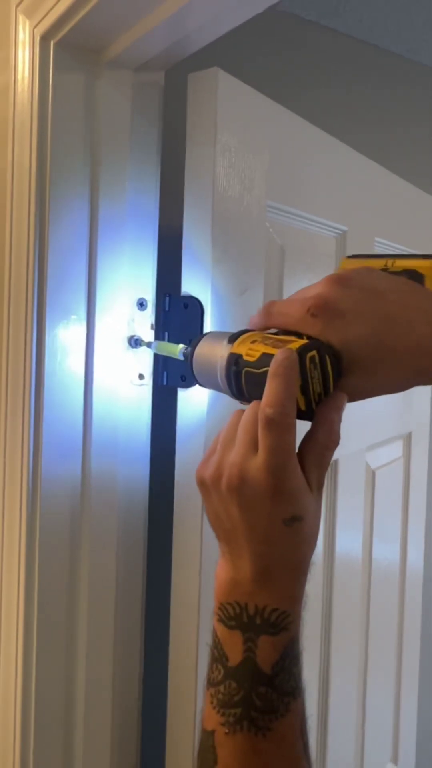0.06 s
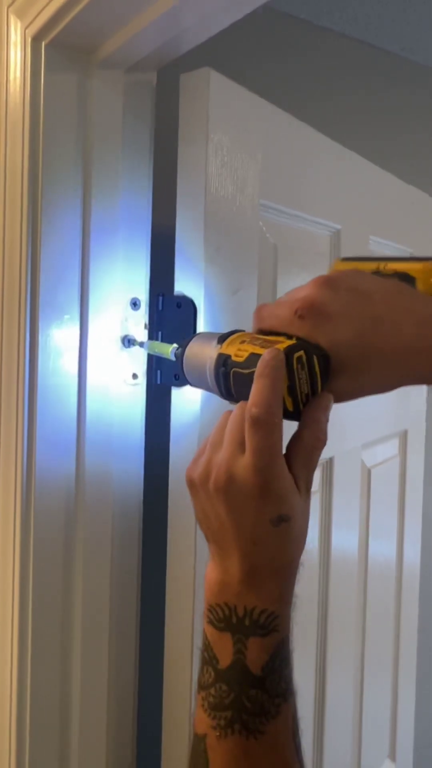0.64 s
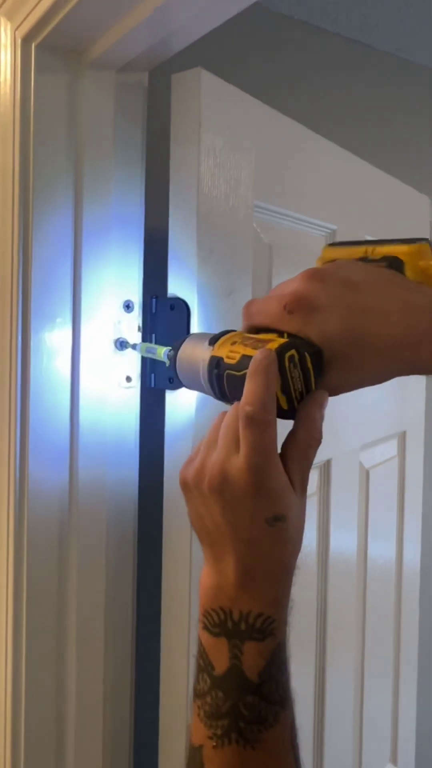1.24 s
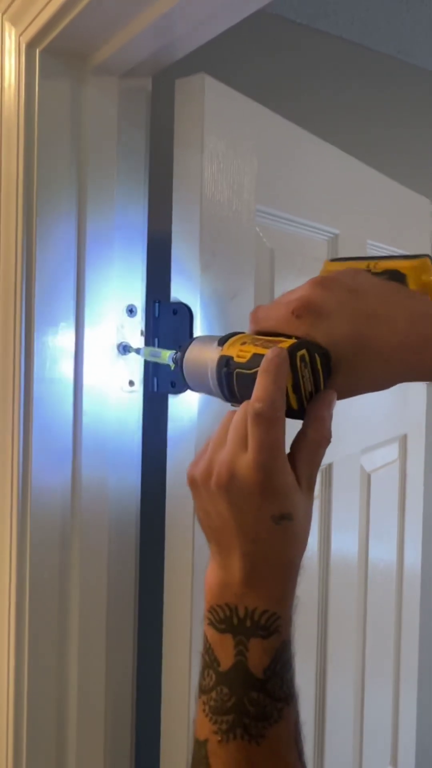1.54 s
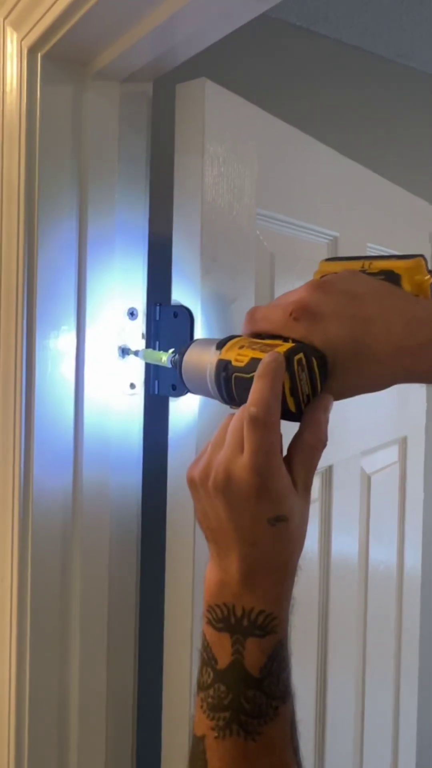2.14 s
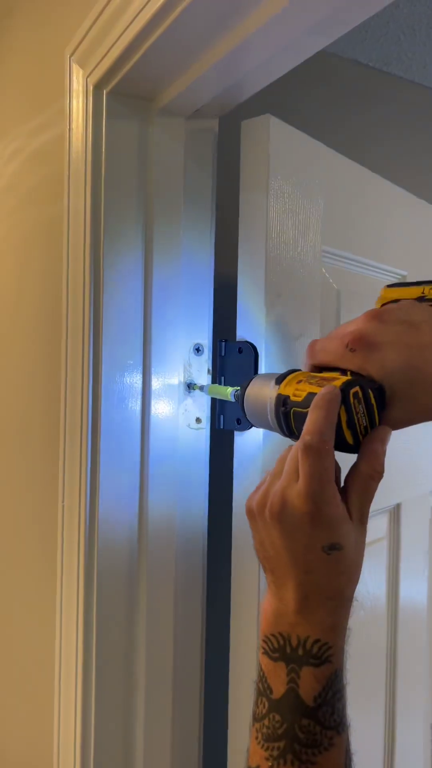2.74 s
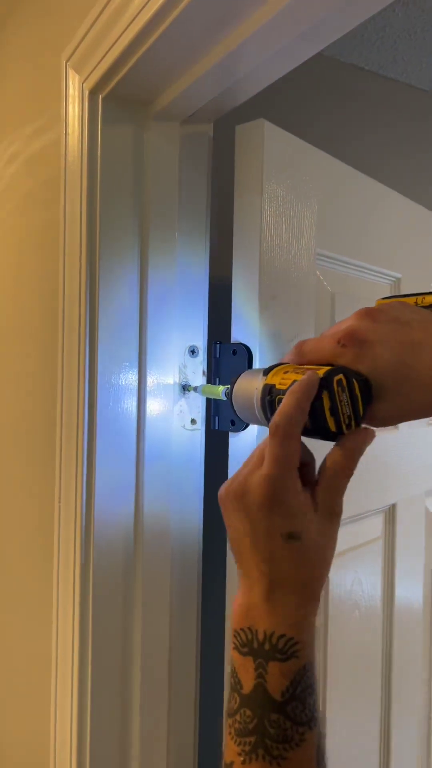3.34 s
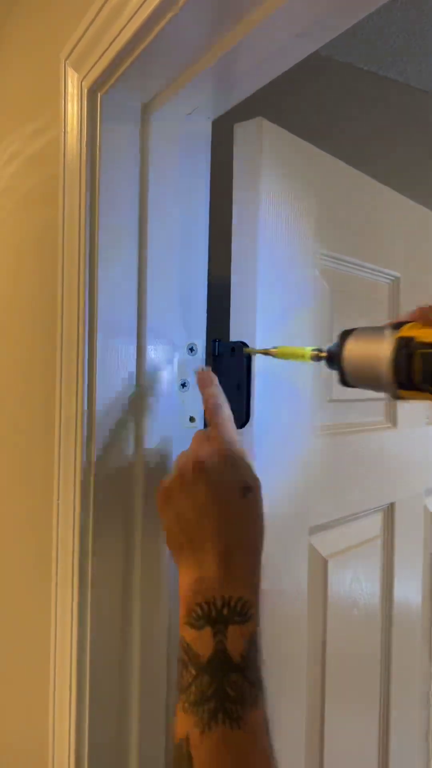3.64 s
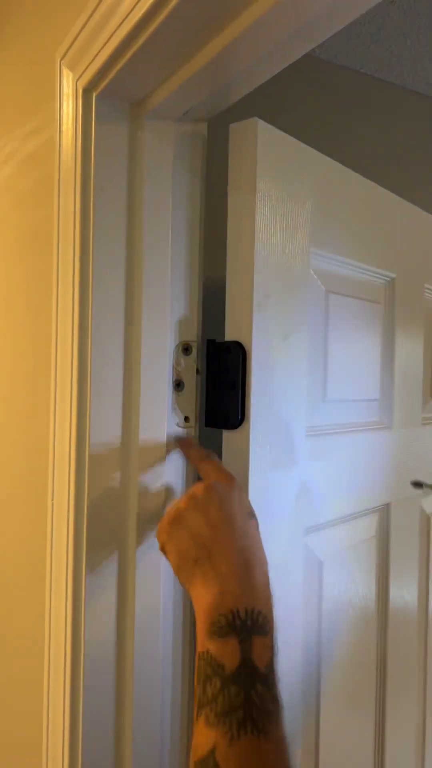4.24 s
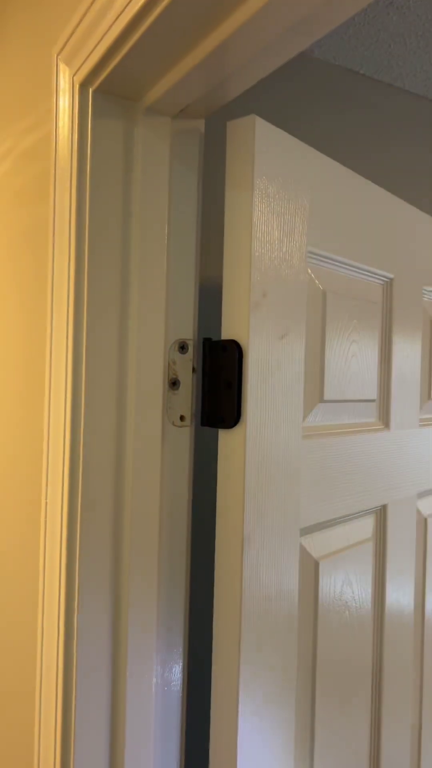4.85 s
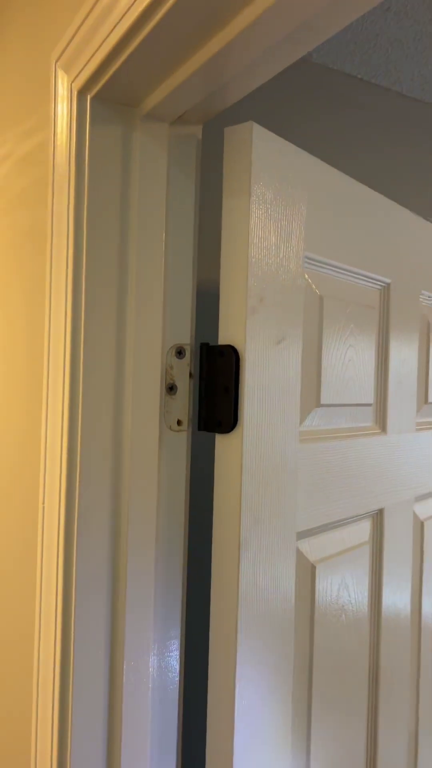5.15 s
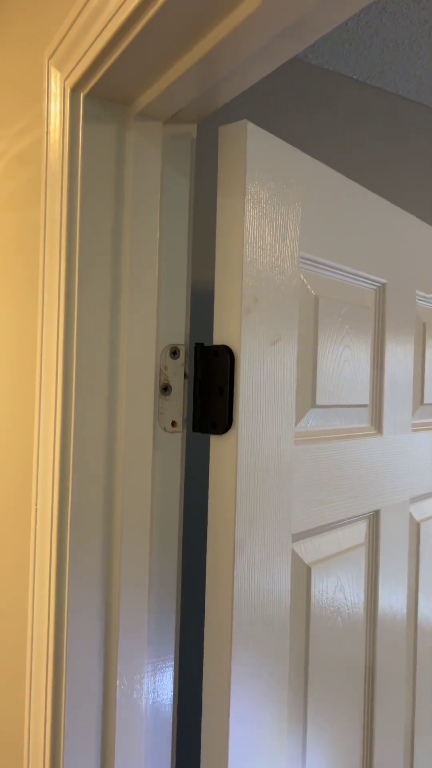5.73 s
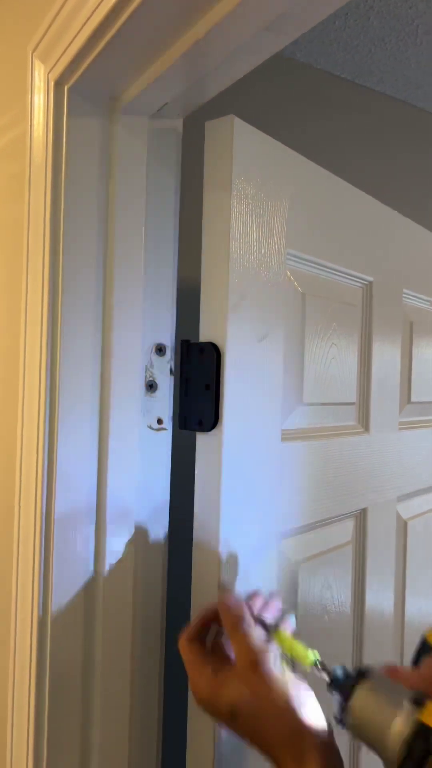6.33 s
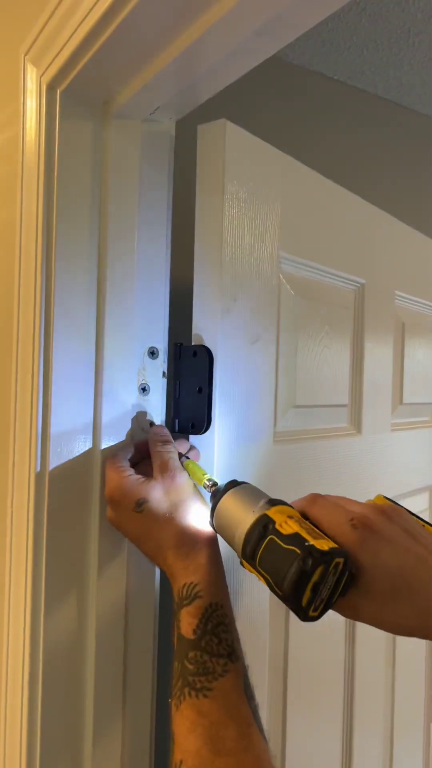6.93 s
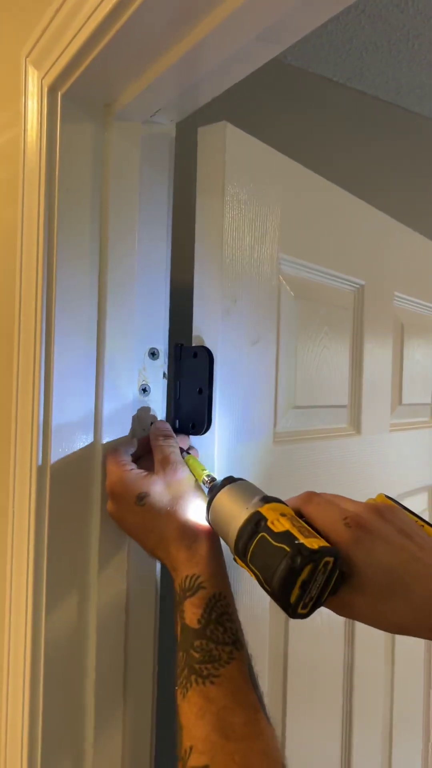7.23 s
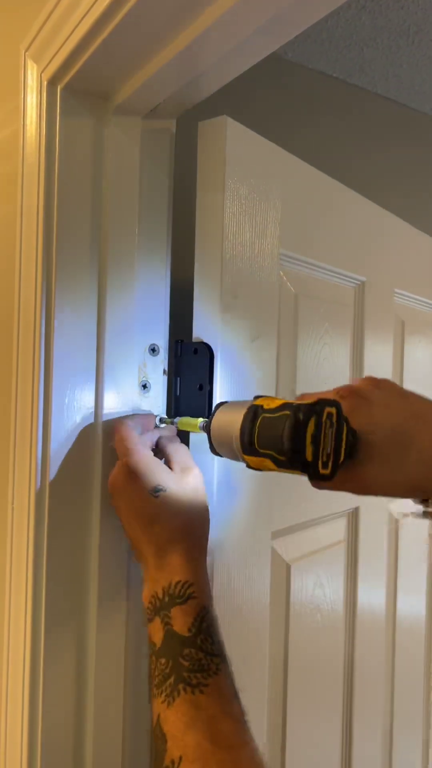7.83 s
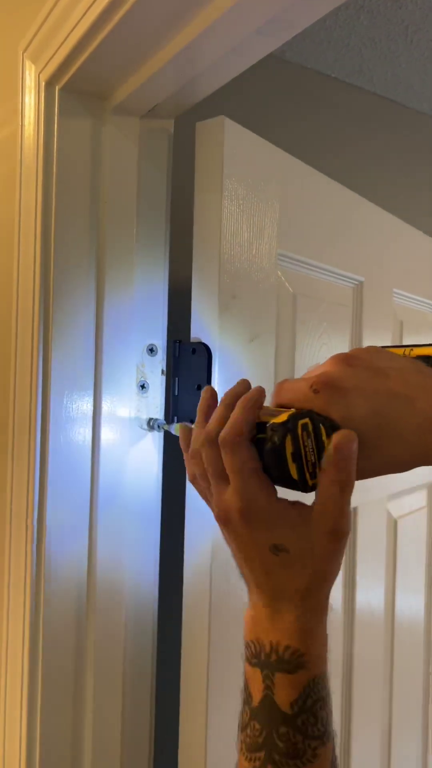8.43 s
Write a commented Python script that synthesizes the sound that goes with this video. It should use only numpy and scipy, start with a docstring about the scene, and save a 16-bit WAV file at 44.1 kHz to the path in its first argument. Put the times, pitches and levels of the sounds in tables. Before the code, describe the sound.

In a bare, echoing hallway, a nearby impact driver fires seven short bursts, the last after a gap, each mixing motor whir, steel clacks, a grinding screw and a low boom from the door. Much softer handling follows over a low rush of air: a fingertip knocks and slides on the hinge, loose screws clink in a palm, and the bit scrapes onto another screw with a light thud.

```python
"""A cordless impact driver sinks a hinge screw into a door frame in short bursts, in a bare hallway.
In each burst the motor whirs up, a hammer inside clacks on a steel block (the anvil) that turns the
bit, the screw grinds in the wood, and the frame and door thump. Then a finger taps and brushes the
hinge, loose screws clink in a hand and the bit is set on the next screw. The walls echo it all,
over a soft rush of air."""
import sys
import numpy as np
from scipy import signal
from scipy.fft import rfft, irfft, next_fast_len
from scipy.io import wavfile

SR = 44100
rng = np.random.default_rng(int(sys.argv[2]) if len(sys.argv) > 2 else 0)


def wav_record(signal):
    """Record a signal, one row per channel, as 16-bit PCM in the file named by sys.argv[1]."""
    frames = np.transpose(np.atleast_2d(signal))
    bounded = np.clip(frames, -1, 1)
    # unit amplitude maps onto the largest positive 16-bit level
    quanta = np.round(bounded * 32767).astype(np.int16)
    wavfile.write(sys.argv[1], SR, quanta)


N = 373968
T = np.arange(N) / SR

# hammer blows, the last row mostly a knock of the wood: (time [s], wind-up rasp [dB], anvil clang [dB], bright
# crack [dB], wood knock [dB],
BLOWS = [(0.022, -15.5, -13, -14, -16.5, -4, 5438), (0.399, -31, -21.5, -19.5, -39.5, -14, 3686),
         (0.4126, -16, -12, -15, -17.5, -1.5, 2430), (0.4187, -30.5, -23.5, -17.5, -22.5, -12, 6400),
         (0.4448, -19.5, -10.5, -13, -16.5, -6, 4830), (0.6883, -31, -20, -27.5, -24, -11.5, 3000),
         (0.702, -19, -16.5, -15, -25, -9.5, 5230), (0.7374, -18, -13, -14, -16, 1.5, 4235),
         (0.9845, -20, -16, -15, -23.5, 2, 6118), (1.011, -17, -11.5, -14, -17.5, -5.5, 6274),
         (1.2301, -22, -17, -14.5, -33, 1, 6250), (1.2511, -13.5, -18.5, -14, -25, -6, 5830),
         (1.2773, -19.5, -16, -17, -25, 1, 5144), (1.5862, -21, -17, -15, -29.5, 2, 5180),
         (1.605, -18.5, -12.5, -18, -22, -14.5, 4800), (1.6225, -30, -26.5, -12.5, -34, -17, 4400),
         (1.6413, -30, -19.5, -24, -37, -13.5, 2500), (1.6646, -12, -15.5, -14.5, -19.5, -0.5, 6000),
         (1.672, -32.5, -21.5, -20.5, -24, -15, 3300), (2.7168, -26.5, -15.5, -16.5, -30, -5, 5420),
         (2.736, -21.5, -10, -13, -20.5, -3.5, 2760), (2.752, -26, -15.5, -13, -24, -16, 5000),
         (2.785, -24.5, -13.5, -17.5, -17.5, -21, 4190), (2.795, -30.5, -24.5, -19.5, -17.5, -9.5, 7000)]
# jolts from the driver's kick, hands or bit: (time [s], door post [dB], panel [dB], frame knock [dB])
JOLTS = [(0.01, -35, -33, -23.5), (0.434, -29.5, -39, -24.5), (0.702, -43.5, -18, -27.5),
         (0.756, -23.5, -24, -24.5), (1.001, -31.5, -37, -29.5), (1.04, -43.5, -27.5, -21),
         (1.238, -26.5, -31.5, -31.5), (1.304, -27, -25, -20.5), (1.591, -25, -27, -38.5),
         (1.691, -24.5, -40.5, -27), (2.442, -46.5, -52, -52.5), (2.724, -35, -45, -31.5),
         (2.78, -27.5, -22.5, -21.5), (7.008, -53, -53.5, -52.5), (7.884, -40.5, -39, -44.5),
         (7.916, -30.5, -44, -48.5), (8.172, -52.5, -53, -61)]
# tone colours of knocked wood and of a grinding screw: (frequency [Hz], level [dB])
KNOCK_COLOUR = [(100, -23), (200, -5), (290, -1), (380, -5.5), (560, 2), (720, -7), (950, -5),
                (1400, -17.5), (2500, -30.5), (6000, -62.5)]
GRIND_COLOUR = [(100, -15.5), (280, 4.5), (550, 4.5), (750, -7.5), (1400, 1.5), (2200, -3.5), (3200, -5),
                (6500, -7.5), (10000, -17.5), (16000, -20)]
# how alike left and right are for near and far sounds: (frequency [Hz], likeness [1 = the same])
NEAR = [(150, .999), (600, 1), (1300, 0.56), (4500, 0.55), (7000, 0.57), (14000, 0.47)]
FAR = [(120, 1), (300, 0.99), (640, 0.57), (1400, 0.56), (5000, 1), (12000, .05)]


def amp(db):
    """Turn decibels into a gain."""
    return 10 ** (np.asarray(db) / 20)


def at_hz(points, hz, column=1):
    """Read a table's column between its rows, on a log-frequency scale."""
    points = np.array(points)
    return np.interp(np.log(np.maximum(hz, 1)), np.log(points[:, 0]), points[:, column])


def level(rows):
    """A gain that moves through (time [s], level [dB]) rows."""
    return amp(np.interp(T, *np.transpose(rows)))


def stereo(mid, side, likeness, hz):
    """Blend a common and an opposing spectrum into left and right."""
    alike = np.clip(at_hz(likeness, hz), -1, 1)
    return np.sqrt(1 + alike) * mid + np.sqrt(1 - alike) * side * [[1], [-1]]


def noise(colour, likeness):
    """Stereo noise of a given tone colour and left-right likeness, with an average power of 1."""
    size = next_fast_len(N)
    hz = np.arange(size // 2 + 1) * SR / size
    mid, side = rfft(rng.standard_normal((2, size))) * amp(at_hz(colour, hz))
    bass_cut = np.minimum(hz / colour[0][0], 1) ** 2
    out = irfft(bass_cut * stereo(mid, side, likeness, hz), size)[:, :N]
    return out / out.std()


def clicks(times, heights):
    """Clicks one sample long."""
    out = np.zeros(N)
    np.add.at(out, np.clip(np.round(np.asarray(times) * SR).astype(int), 0, N - 1), heights)
    return out


def bursts(times, db, t60, rise):
    """Loudness of hits that build in about `rise` seconds and fade by 60 dB in `t60` seconds."""
    fall, swell = amp(-120 / (t60 * SR)), np.exp(-1 / (rise * SR))
    energy = signal.lfilter([1], [1, -fall], clicks(times, amp(db) ** 2) + 1e-20)
    return np.sqrt(signal.lfilter([1 - swell], [1, -swell], energy))


def ring(force, hz, t60):
    """Each click starts a fading pure tone as strong as the click."""
    fade, step = amp(-60 / (t60 * SR)), 2 * np.pi * hz / SR
    return signal.lfilter([0, np.sin(step)], [1, -2 * fade * np.cos(step), fade * fade], force + 1e-18)


def add(out, at, sound):
    """Mix a short sound in at a given time."""
    first = max(round(at * SR), 0)
    out[..., first:first + len(sound)] += sound[:N - first]


def air(level_db=-59.5):
    """Air rushes softly and steadily, mostly in the bass."""
    # tone colour of the air: (frequency [Hz], level [dB])
    air_colour = [(15, -38.5), (25, -14), (80, -3.5), (108, -10), (255, -16), (293, -13.5), (326, -19.5),
                  (695, -17.5), (820, -28.5), (1020, -22.5), (1400, -25), (1800, -32), (16000, -77)]
    return amp(level_db) * noise(air_colour, FAR)


def hallway(sound, early_db=2.5, early_t60=0.31, gap_s=0.014):
    """Dense echoes: a quick share from the doorway and a long tail that dies away band by band."""
    # echo of the bare walls: (frequency [Hz], fade time [s], level [dB])
    walls = [(59.93, 0.68, -5), (155.86, 0.49, 0.5), (500, 0.85, -3.5), (1000, 1.05, -8.5), (1492, 1.3, -2),
             (2236, 0.98, -12.5), (6000, 0.97, -9.5), (8973, 0.71, -7), (15280, .38, -11)]
    size = 65536
    t, hz = np.arange(size) / SR, np.arange(size // 2 + 1) * SR / size
    centres = np.geomspace(50, 16000, 18)
    mid, side = rfft(rng.standard_normal((2, size)))
    white = stereo(mid, side, FAR, hz) / np.sqrt(2)
    onset, echo = 1 - np.exp(-(t / gap_s) ** 2), 0
    for centre, share in zip(centres, np.eye(len(centres))):
        band = irfft(white * np.interp(np.log(hz + 1), np.log(centres), share), size)
        late, early = (amp(-60 * t / t60) * onset for t60 in (at_hz(walls, centre), early_t60))
        energy = late ** 2 / np.sum(late ** 2) + amp(early_db) ** 2 * early ** 2 / np.sum(early ** 2)
        echo = echo + band * np.sqrt(energy) * amp(at_hz(walls, centre, column=2))
    return signal.fftconvolve(sound.mean(axis=0, keepdims=True), echo, axes=1)[:, :N]


def microphone_ports(sound, lead_rad=-0.3):
    """Above about 5 kHz the direct sound reaches the two microphone openings out of step."""
    size = next_fast_len(N)
    turn = np.interp(np.arange(size // 2 + 1) * SR / size, [4600, 6500], [0, lead_rad])
    return irfft(rfft(sound, size) * np.exp(.5j * turn * [[1], [-1]]), size)[:, :N]


def finger_brush():
    """A finger slides over the hinge with a faint hiss."""
    # loudness of the slide: (time [s], level [dB])
    stroke = [(3.95, -110), (4.1, -74), (4.17, -74), (4.235, -60), (4.3, -81.5), (4.7, -86.5), (4.95, -110)]
    # tone colour of rubbing skin: (frequency [Hz], level [dB])
    skin_colour = [(600, -10), (2000, 0.5), (4000, -10.5), (7000, -3), (10000, -11), (15000, -12)]
    return level(stroke) * noise(skin_colour, FAR)


def finger_tap(at=3.751, tap_db=-43, hollow_db=-53):
    """A fingertip taps the hinge: the wood behind it gives a short, hollow knock."""
    hollow = ring(clicks([at], amp(hollow_db)), hz=323, t60=0.16)
    return hollow + bursts([at], [tap_db], t60=0.084, rise=0.00057) * noise(KNOCK_COLOUR, NEAR)


def rattled(rows, spread_s, loss_db, count=3):
    """Each touch is followed by a few weaker ones at uneven delays."""
    rows = np.array(rows)
    chance = rng.random((len(rows), count, 2))
    after = np.repeat(rows[:, None], count, axis=1)
    after[..., 0] += spread_s * np.cumsum(0.64 + chance[..., 0], axis=1)
    after[..., 1] -= loss_db * (np.sqrt(np.arange(1, count + 1)) + chance[..., 1])
    return np.vstack([rows, after.reshape(-1, 3)])


def steel_ticks(rows, tones, ring_t60, ring_db, tick_db, snap_db, detune):
    """Small steel parts touch: a tick, a bright snap and a ring whose pitch varies with each touch."""
    # tone colours of the tick and the snap: (frequency [Hz], level [dB])
    tick_colour = [(300, -23), (1200, 2.5), (2200, 6.5), (3300, 2.5), (5500, -6.5), (8000, -23),
                   (15000, -41.5)]
    snap_colour = [(3000, -24.5), (6000, 1.5), (8000, -3.5), (11000, -6), (15500, -19.5)]
    times, db, treble = np.transpose(rows)
    out = amp(tick_db) * bursts(times, db, t60=0.058, rise=0.00015) * noise(tick_colour, NEAR)
    out += amp(snap_db) * bursts(times, db + treble, t60=0.03446, rise=0.00022) * noise(snap_colour, NEAR)
    t = T[:SR // 5]
    fade = amp(-60 * t / ring_t60)
    for at, touch_db, (grip, *chance) in zip(times, db, rng.standard_normal((len(db), len(tones) + 1))):
        tone = sum(amp(tone_db + 2 * luck) * np.sin(2 * np.pi * hz * (1 + detune * grip) * t)
                   for (hz, tone_db), luck in zip(tones, chance))
        add(out, at, amp(touch_db + ring_db) * fade * tone)
    return out


def loose_screws():
    """Screws clink together in the palm, which barely lets them ring; last, a screw is set on the bit."""
    # screws touching: (time [s], level [dB], extra treble [dB])
    clinks = [(5.2116, -58.5, -9), (5.306, -62, -9), (5.3991, -51, -16), (5.4125, -53, -3),
              (5.5643, -46, -23), (5.6266, -53, -26)]
    # ringing tones of a screw: (frequency [Hz], level [dB])
    screw_tones = [(3380, 5), (4870, -3.5), (5566, -10), (8000, -12)]
    return steel_ticks(rattled(clinks, spread_s=0.0056, loss_db=5.0), screw_tones,
                       ring_t60=0.021, ring_db=-8.0, tick_db=-9.0, snap_db=-5.0, detune=0.032)


def bit_ticks():
    """The bit ticks on hinge and screw heads; held tight in the driver, it barely rings."""
    # ticks of bit and trigger: (time [s], level [dB], extra treble [dB])
    touches = [(1.5595, -20.5, 4), (2.4209, -44, -13.5), (2.4957, -42.5, -34), (2.6309, -54, -9),
               (3.3972, -40, -2.5), (3.4161, -40.5, -14), (6.3844, -53, -19), (7.0085, -56, -37),
               (7.3794, -62.5, -30), (7.5694, -61, -22), (7.7677, -49.5, -24.5), (7.8555, -37, -21.5),
               (7.8795, -34, -15.5), (8.0202, -51.5, -19), (8.2694, -57, -21), (8.289, -58, -19.5),
               (8.322, -61, -19)]
    # ringing tones of the bit: (frequency [Hz], level [dB])
    bit_tones = [(1400, -1), (2050, 1), (2490, 0), (2900, -2)]
    return steel_ticks(rattled(touches, spread_s=0.015, loss_db=7.5), bit_tones,
                       ring_t60=0.025, ring_db=-11.5, tick_db=-7.0, snap_db=-6.0, detune=0.064)


def bit_skid(start=7.86, end=7.908, skid_db=-40.5, wood_db=-8.0, count=16):
    """The bit skids into the screw head in a quick run of touches that swells and fades."""
    times = np.linspace(start, end, count) + rng.normal(0, 0.0011, count)
    force_db = rng.normal(0, 2.9, count) + 20 * np.log10(np.hanning(count + 2)[1:-1])
    scrape = noise(GRIND_COLOUR, NEAR) + amp(wood_db) * noise(KNOCK_COLOUR, NEAR)
    return bursts(times, skid_db + force_db, t60=0.012, rise=0.00015) * scrape


def door_boom(push_s=0.0058, detune=0.016):
    """Each jolt sets door post, panel and frame booming at their own pitches; the hinge rings faintly."""
    # tones of the post, the panel, and the frame with its hinge: (frequency [Hz], level [dB], fade [s])
    post_tones = [(61.02, -1, 0.31), (91, 0.5, 0.37)]
    panel_tones = [(158, 2.5, 0.34)]
    frame_tones = [(182.8, -8, 0.27), (310.2, -10.5, .15), (392, -22.5, 0.34), (472, -19, 1.3),
                   (588, -17, .55), (1550, -35, 1.1)]
    times, *forces = np.transpose(JOLTS)
    out, t = np.zeros(N), T[:SR]
    swell = 1 - np.exp(-t / push_s)
    for tones, force in zip((post_tones, panel_tones, frame_tones), forces):
        for at, force_db, shifts in zip(times, force, rng.standard_normal((len(times), len(tones)))):
            boom = sum(amp(db - 60 * t / t60) * np.sin(2 * np.pi * hz * (1 + detune * shift) * t)
                       for (hz, db, t60), shift in zip(tones, shifts))
            add(out, at, amp(force_db) * swell * boom)
    return out


def wood_thuds():
    """The wood gives a dull knock with each jolt."""
    times, _, _, knock_db = np.transpose(JOLTS)
    return bursts(times, knock_db, t60=0.11, rise=0.0009) * noise(KNOCK_COLOUR, NEAR)


def grinding_hum():
    """A low, rough grinding hum lingers between the bursts and dies away."""
    # loudness of the hum: (time [s], level [dB])
    hum_levels = [(0, -31.5), (.12, -37.5), (.29, -32), (.39, -41.5), (.63, -36.5), (.85, -48.5),
                  (1.95, -60), (2.35, -86.5)]
    # its tone colour: (frequency [Hz], level [dB])
    hum_colour = [(60, -7), (150, -5), (470, -1.5), (750, -6), (1550, -5), (2600, -14.5), (6000, -15),
                  (9000, -27), (15000, -44.5)]
    return level(hum_levels) * noise(hum_colour, FAR)


def motor(spin_up_s=0.02, spin_up_db=20, start_hz=2600, top_hz=4100, gear_db=-5, coast_t60=0.022,
          chatter_db=4.5, load_db_per_s=260, rest_after_s=0.01, rest_half_s=0.0032, rest_db=-14.5):
    """Gears whir up in pitch and level until the hammer engages; then the screw grinds unevenly."""
    # trigger pulls: (start [s], release [s], whir [dB], grinding [dB])
    pulls = [(-0.01, 0.019, -20, -21), (0.384, 0.415, -17.5, -25), (0.661, 0.784, -25, -28.5),
             (0.953, 1.064, -24, -31.5), (1.201, 1.312, -26, -24), (1.565, 1.684, -27, -27),
             (2.686, 2.815, -30.5, -24.5)]
    # tone colour of the whir: (frequency [Hz], level [dB])
    whir_colour = [(250, -11), (900, -14.5), (1500, -10.5), (2100, 2), (3700, -3.5), (5000, -6.5),
                   (7000, -9), (10000, -20.5), (16000, -28.5)]
    whir, grind, gear_hz = np.zeros((3, N))
    for start, release, whir_db, grind_db in pulls:
        engage = start + spin_up_s
        speed = 1 - np.clip(1 - (T - start) / spin_up_s, 0, 1) ** 2
        coast = amp(-60 * np.clip((T - release) / coast_t60, 0, 3))
        load_db = load_db_per_s * np.clip(T - engage, 0, 1)
        whir += (T >= start) * amp(whir_db - spin_up_db * (1 - speed) - load_db) * coast
        grind += (T >= engage) * amp(grind_db) * coast
        gear_hz = np.where(T >= start, start_hz + (top_hz - start_hz) * speed, gear_hz)
    for at, *_ in BLOWS:   # the screw stands still for a moment after each blow
        grind[np.abs(T - at - rest_after_s) < rest_half_s] *= amp(rest_db)
    wobble, slip = [np.interp(T, np.arange(4000) / 400, row) for row in rng.standard_normal((2, 4000))]
    gear_tone = np.sin(2 * np.pi * np.cumsum(gear_hz * (1 + 0.073 * wobble)) / SR)
    whirring = whir * (noise(whir_colour, NEAR) + amp(gear_db) * gear_tone)
    return whirring + grind * amp(chatter_db * slip - 1) * noise(GRIND_COLOUR, NEAR)


def hammer_contacts():
    """In each blow the hammer catches the anvil, slams home and bounces back: three contacts."""
    # what each contact adds to its blow: (delay [s], clang [dB], crack [dB], knock [dB])
    offsets = [(-0.0054, 2, -0.5, -4), (0, 3, 2.5, 1), (0.0043, -10, -6.5, -10)]
    times, _, clang, crack, knock, catch_db, _ = np.transpose(BLOWS)
    catch, slam, bounce = (np.column_stack([times, clang, crack, knock]) + row for row in offsets)
    catch[:, 1:] += catch_db[:, None]
    return np.vstack([catch, slam, bounce])


def hammer(clang_db=-0.5, crack_db=4.5, spike_db=16.0, anvil_db=4.5, bit_db=7.5, knock_db=3.0):
    """The hammer winds up with a rasp, cracks, rings anvil and bit, and knocks the wood via the screw."""
    # ringing tones of the anvil: (frequency [Hz], width [Hz], level [dB])
    anvil_tones = [(910.5, 80, -14), (2170, 170, -3), (2900, 390, -5.5)]
    # tone colours of steel hitting steel: (frequency [Hz], level [dB])
    clang_colour = [(400, -28), (1400, -7.5), (2200, 2), (3000, -1.5), (3900, -2), (5000, -23.5),
                    (9000, -41.5)]
    crack_colour = [(2000, -18), (3500, -5.5), (4500, 2.5), (6500, 3), (8000, -5), (10500, -12.5),
                    (15500, -15)]
    slam_times, rasp, _, slam_crack, _, _, bit_hz = np.transpose(BLOWS)
    # a fade run backwards grows toward each blow and stops there
    wind_up = bursts(T[-1] - slam_times + .0025, rasp, t60=0.049, rise=0.001)[::-1]
    out = wind_up * (noise(GRIND_COLOUR, NEAR) + noise(clang_colour, NEAR)) / np.sqrt(2)
    times, clang, crack, knock = hammer_contacts().T
    out += amp(clang_db) * bursts(times, clang, t60=0.0097, rise=.0006) * noise(clang_colour, NEAR)
    out += amp(crack_db) * bursts(times, crack, t60=0.011, rise=0.0003) * noise(crack_colour, NEAR)
    treble_band = signal.butter(1, [2500, 9500], "band", fs=SR, output="sos")
    out += signal.sosfilt(treble_band, clicks(times + .0005, amp(crack + spike_db)))
    for hz, width, db in anvil_tones:
        strength = amp(clang + db + anvil_db + 2.8 * rng.standard_normal(len(times)))
        strikes = clicks(times + rng.uniform(0, .001, len(times)), strength)
        out += ring(strikes, hz, t60=np.log(1000) / (np.pi * width))
    one_click = T[:SR // 20] == 0
    for at, db, hz in zip(slam_times, slam_crack, bit_hz):
        add(out, at + .001, ring(one_click, hz, t60=.006) * amp(db + bit_db))
    return out + amp(knock_db) * bursts(times, knock, t60=0.038, rise=0.00054) * noise(KNOCK_COLOUR, NEAR)


def scene():
    """Driver, door and hands sound in the hallway over a soft rush of air."""
    driver = motor() + hammer() + wood_thuds() + grinding_hum()
    hands = bit_ticks() + loose_screws() + finger_tap() + bit_skid() + finger_brush()
    boom = door_boom()
    echo = hallway(amp(-3.5) * driver + amp(-2.5) * hands + amp(-10.5) * boom)
    return microphone_ports(driver + hands) + boom + echo + air()


def record(dry, bass_cut_hz=52, top_cut_hz=16200):
    """The sound narrows to almost mono at 2-5 kHz, loses deep bass and the very top; peaks are rounded."""
    # stereo width: (frequency [Hz], gain of left minus right [dB])
    widths = [(1500, 0.5), (1900, -19.5), (2400, -22), (4700, -21), (5500, 4)]
    size = next_fast_len(N)
    width = amp(at_hz(widths, np.arange(size // 2 + 1) * SR / size))
    side = irfft(rfft((dry[0] - dry[1]) / 2, size) * width, size)[:N]
    bass_cut = signal.butter(3, bass_cut_hz, "high", fs=SR, output="sos")
    top_cut = signal.ellip(10, .2, 80, top_cut_hz, fs=SR, output="sos")
    left_right = signal.sosfilt(bass_cut, dry.mean(axis=0) + side * [[1], [-1]])
    return signal.sosfilt(top_cut, .92 * np.tanh(left_right))


dry = scene()
out = record(dry)
wav_record(out)
```